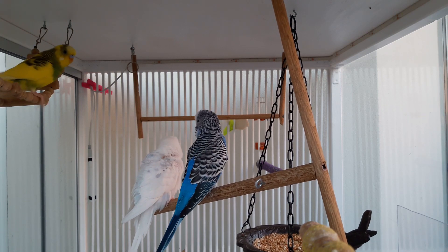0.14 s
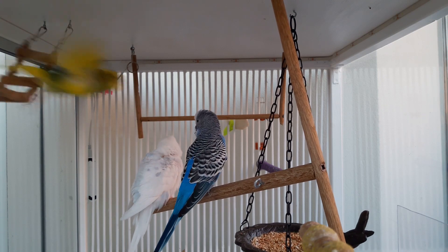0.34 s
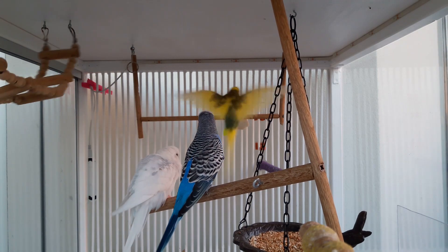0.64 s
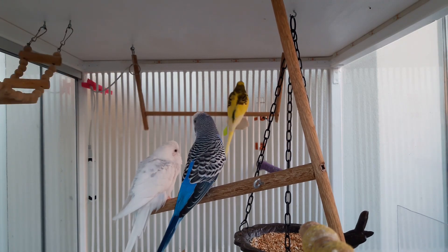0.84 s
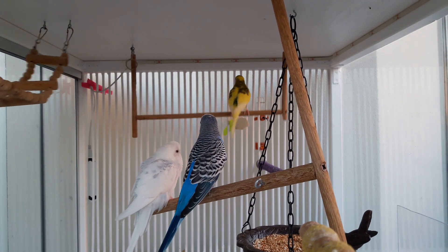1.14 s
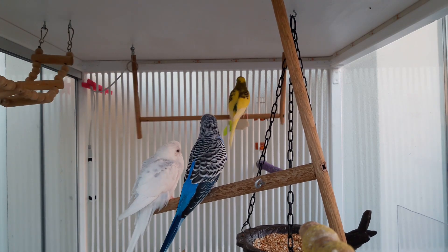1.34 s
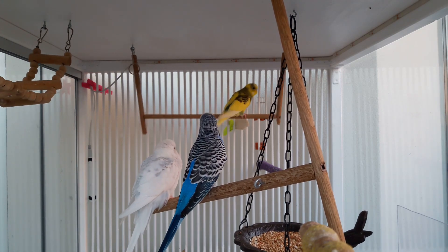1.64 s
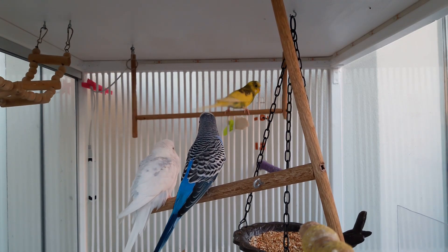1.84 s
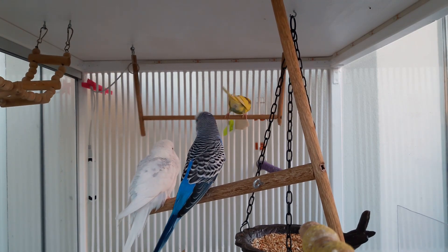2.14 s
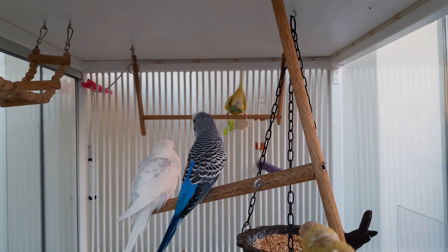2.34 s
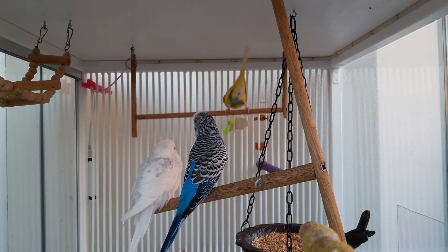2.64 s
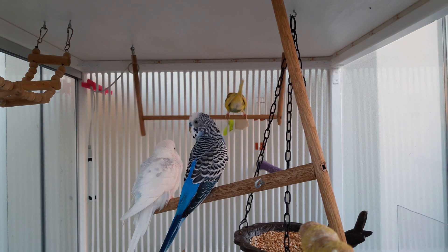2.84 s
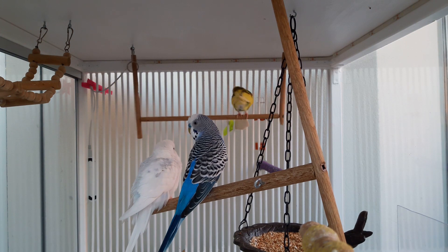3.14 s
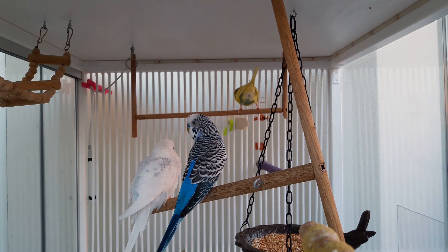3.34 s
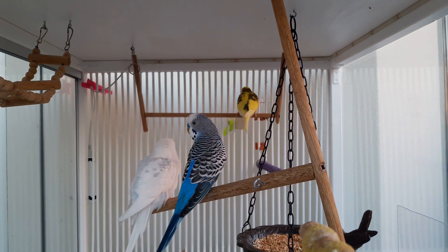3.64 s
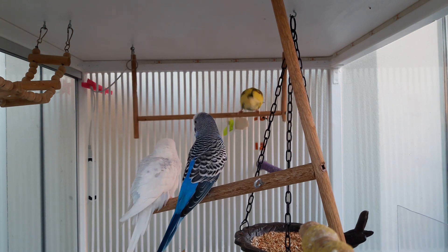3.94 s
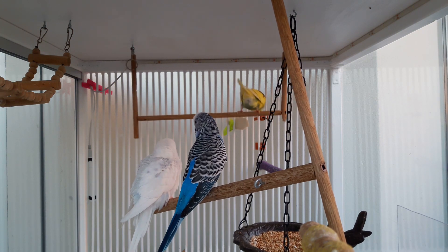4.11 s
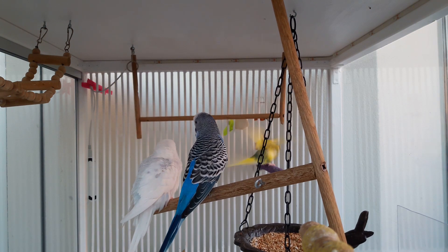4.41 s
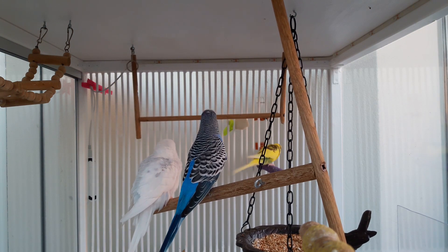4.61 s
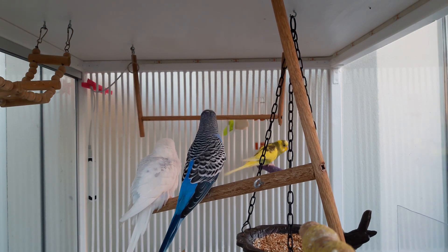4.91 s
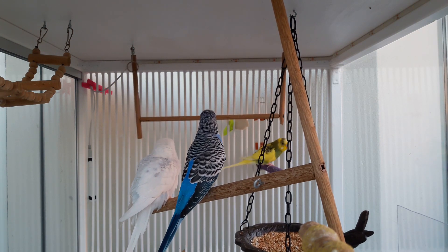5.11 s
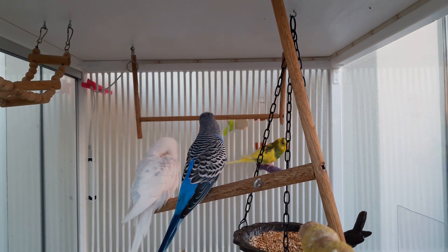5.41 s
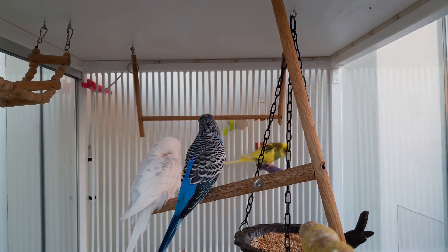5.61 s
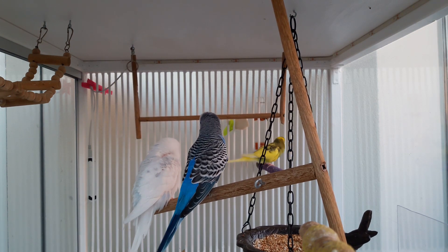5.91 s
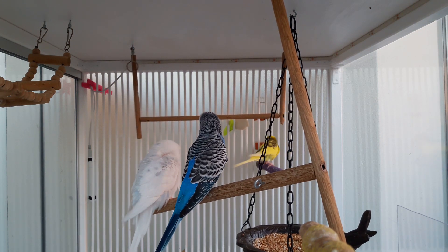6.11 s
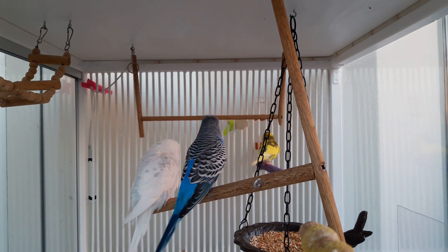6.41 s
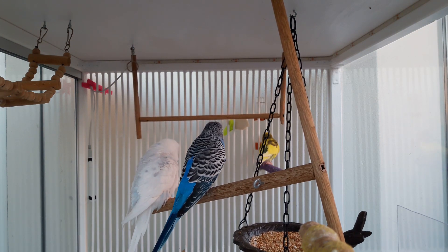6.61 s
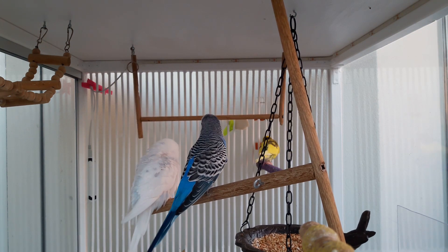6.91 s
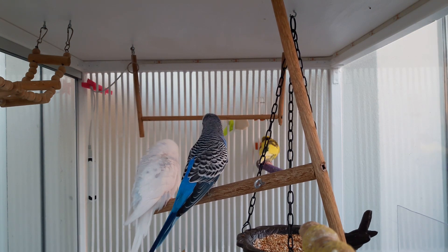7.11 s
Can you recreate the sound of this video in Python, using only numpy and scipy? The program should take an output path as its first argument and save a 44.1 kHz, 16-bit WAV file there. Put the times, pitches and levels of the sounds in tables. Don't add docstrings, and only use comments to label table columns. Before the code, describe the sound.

Short soft wing burst, a sharp perch thud and clinking chain, scattered claw ticks, then two little clusters of quick chirps in a humming small room.

```python
import sys
import numpy as np
from scipy import signal
from scipy.fft import rfft, irfft
from scipy.io import wavfile
from scipy.ndimage import uniform_filter1d

SR = 44100
rng = np.random.default_rng(int(sys.argv[2]) if len(sys.argv) > 2 else 0)


def persist_wave(psi):
    counts = np.round(np.clip(psi, -1, 1) * 32767).astype(np.int16)
    wavfile.write(sys.argv[1], SR, np.atleast_2d(counts).T)


def elevation(decibels):
    levels = np.asarray(decibels, float)
    return 10 ** (levels / 20)


N = 320166
FREQ = np.fft.rfftfreq(N, 1 / SR) + 1e-3


def unit(x):
    return x / np.sqrt(np.mean(x ** 2))


def across(table):
    hz, value = np.transpose(table)
    return np.interp(np.log(FREQ), np.log(hz + 1), value)


def coloured(table):
    white = rng.standard_normal(N)
    return unit(irfft(rfft(white) * elevation(across(table)), N))


def walk(rate_hz):
    hold = int(SR / rate_hz)
    steps = np.repeat(rng.standard_normal(N // hold + 1), hold)
    smooth = uniform_filter1d(uniform_filter1d(steps, hold), hold)
    return unit(smooth[:N])


def ring(x, hz, width_hz):
    return signal.lfilter(*signal.iirpeak(hz, hz / width_hz, fs=SR), x)


def add(out, x, start_s, pan_db, lag=0):
    i = int(start_s * SR) + 20
    x = x[:N - i - 20]
    out[0, i + lag:i + lag + len(x)] += x * elevation(pan_db / 2)
    out[1, i:i + len(x)] += x * elevation(-pan_db / 2)


def bird():
    # start_s [s], length_s [s], pitch_hz [Hz], glide_hz over the note [Hz], peak_db [dB]
    whistles = [
        (3.103, 0.049, 2800, 113, -35),
        (3.13, 0.04, 2542, -1, -31.5),
        (3.787, 0.052, 1805, -45, -32),
        (5.329, 0.063, 3000, -100, -43),
        (5.572, .022, 3830, -190, -30.5),
        (2.41, 0.36, 3730, -67, -70),
    ]
    rasps = [
        (3.156, 0.047, 3303, -200, -37),
        (3.197, 0.033, 2098, -58, -31.5),
        (3.2, 0.044, 1747, -58, -38),
        (5.38, 0.037, 3414, -260, -38.5),
        (5.42, .04, 2216, -100, -31.5),
        (5.585, 0.051, 3420, -300, -29),
    ]
    reeds = [
        (3.301, 0.081, 1648, -23, -34),
        (3.387, 0.014, 1442, -84, -30),
    ]
    nasals = [
        (3.738, 0.052, 1237, 30.2, -34),
    ]
    screeches = [
        (5.522, .034, 2720, -150, -33),
        (5.527, 0.033, 2057, -24, -28.5),
        (5.534, 0.025, 1496, -55, -38.5),
    ]
    warbles = [
        (5.357, 0.056, 2440, 40, -35.5),
    ]
    shrills = [
        (5.491, .034, 1762, 0, -36),
    ]
    # time_s [s], left minus right pan_db [dB]
    head = [
        (3.1, -1.5),
        (3.3, -3.5),
        (3.74, -1),
        (3.8, -5),
        (5.33, -6),
        (5.4, -1.5),
        (5.45, -1.5),
        (5.52, -4),
        (5.6, 1),
    ]
    voices = [
        (whistles, dict(rasp=0.23, flutter_hz=240, parts_db=(-28.5, -33, -33), fall_db=15, dull_db=2.5,
                        air_db=-26.5)),
        (rasps, dict(rasp=0.64, flutter_hz=328.2, parts_db=(-27, -37, -42), fall_db=7, dull_db=6, air_db=-32)),
        (reeds, dict(rasp=0.18, flutter_hz=192.5, parts_db=(-24.5, -20.5, -28), fall_db=2, dull_db=5.5,
                     air_db=-23.5, hold=0.59)),
        (shrills, dict(rasp=0.15, flutter_hz=300, parts_db=(-17, -13, -14), fall_db=3.5, dull_db=2.5,
                       air_db=-13.5, hold=1.4)),
        (nasals, dict(rasp=0.064, flutter_hz=198, parts_db=(3.5, -2, -20), fall_db=3, dull_db=-12.5,
                      air_db=-23, warble=0.59, warble_hz=42.7)),
        (screeches, dict(rasp=0.35, flutter_hz=340, parts_db=(-14, -24.5, -17.5), fall_db=10, dull_db=-1.5,
                         air_db=-15.5, hold=0.39)),
        (warbles, dict(rasp=0.05, flutter_hz=236, parts_db=(-29, -32, -45), fall_db=13, dull_db=2,
                       air_db=-35, warble=0.69, warble_hz=94))]
    swell_db, fade_db, crest_share = -1, 10.5, 0.47
    out = np.zeros((2, N))
    wander, shake, throb = walk(150), walk(500), walk(160)
    air = coloured([(800, -16), (1500, 18.0), (4000, 3.0), (9000, -28.5), (15000, -5.0)])
    for notes, v in voices:
        rasp = v["rasp"]
        higher_db = v["parts_db"][-1] - v["fall_db"] * np.arange(1, 12)
        ladder_db = np.r_[v["parts_db"], higher_db]
        for start_s, length_s, pitch_hz, glide_hz, peak_db in notes:
            t = np.arange(0, length_s, 1 / SR)
            along = t / length_s
            at = slice(int(start_s * SR), int(start_s * SR) + len(t))
            hz = pitch_hz + glide_hz * along
            end_db = fade_db * (1 - v.get("hold", 0))
            level_db = peak_db - np.interp(along, [0, crest_share, 1], [swell_db, 0, end_db])

            flutter = 2 * np.pi * np.cumsum(v["flutter_hz"] * (1 + 0.3 * wander[at])) / SR
            shaky_hz = hz * (1 + 0.006 * throb[at] + 0.014 * shake[::-1][at])
            phase = 2 * np.pi * np.cumsum(shaky_hz) / SR
            phase += rasp * (1.3 * np.sin(flutter) + 0.5 * shake[at])

            count = int(15000 / hz.max())
            upper = sum(elevation(db) * np.sin((k + 2) * phase) for k, db in enumerate(ladder_db[:count - 1]))
            stack = np.sin(phase) + upper * elevation(v["dull_db"] * (1 - along))
            stack += elevation(v["air_db"]) * air[at] * (1 + np.sin(phase))
            stack *= elevation(level_db + 4.5 * np.minimum(throb[::-1][at], 0.5))
            quiver = np.sin(2 * np.pi * v.get("warble_hz", 1) * t * (1 - 0.071 * along) - 0.9)
            stack *= 1 - v.get("warble", 0) * quiver
            edges = np.clip(np.minimum(t / 0.004, (length_s - t) / 0.006), 0, 1)
            stack *= 1.4 * edges * (1 + rasp * np.cos(flutter + 1.9))
            add(out, stack, start_s, np.interp(start_s, *np.transpose(head)), lag=16)
    return signal.sosfilt(signal.butter(4, 1150, "high", fs=SR, output="sos"), out)


def wings():
    # start_s [s], length_s
    # [s], air rush_db [dB], rustle_db and feather hiss_db [dB against the rush]
    bouts = [(0.184, 0.18, -53.5, -14, -38), (0.409, 0.046, -43, -3.5, -8), (0.494, 0.21, -37, -8, -9.5),
             (0.745, 0.0067, -25, -16, -40), (0.803, 0.037, -35, -7.5, -36), (0.941, 0.14, -45.5, -17, -40),
             (1.102, .12, -41.5, -13, -39), (1.247, 0.17, -53, -17, -33), (2.165, 0.13, -51.5, -25, -34),
             (3.45, 0.21, -50, -23, -34), (4.169, 0.092, -50, -22, -32), (4.282, 0.11, -48.5, -25, -20),
             (4.436, 0.072, -46.5, -9, -7), (4.525, .06, -55.5, -19, -20)]
    # hz [Hz], level_db [dB per Hz]
    rush_spectrum = [(18, -39), (30, -13.5), (125, 0), (221, 2.5), (393, -4.5), (548, -11.5), (2500, -19.5),
                     (3250, -52)]
    rustle_spectrum = [(880, -37), (1500, -5), (2100, 2.5), (4380, 0.5), (5290, -3), (7750, -16),
                       (9000, -54), (19800, -80)]
    hiss_spectrum = [(4710, -7), (8000, -4.5), (9180, -5.5), (12000, -1.5), (15200, -5), (15600, -22)]
    rise_s, t60_s, pan_db = 0.015, 0.2, -5.5
    beat_s, beat_hz, beat_depth, gust_depth = 0.45, 18.23, 0.22, 0.88
    t = np.arange(N) / SR
    start_s, length_s, rush_db, rustle_db, hiss_db = np.transpose(bouts)[:, :, None]
    rise = np.clip((t - start_s) / rise_s + 1, 0, 1)
    shapes = rise * elevation(-60 * np.clip(t - start_s - length_s, 0, 1) / t60_s)
    gust, rustle, hiss = (np.sum(shapes * elevation(rush_db - 5.5 + db), axis=0) for db in (0, rustle_db, hiss_db))

    flying = np.clip(np.minimum(t - 0.4, 0.78 - t) / 0.031, 0, 1)
    beat = flying * np.cos(2 * np.pi * beat_hz * (t - beat_s))
    stroke = 1 + beat_depth * beat
    rush = coloured(rush_spectrum) * elevation(2.5 * walk(60)) * (1 + gust_depth * beat)
    out = np.zeros((2, N))
    for ear, side in enumerate((1, -1)):
        feathers = coloured(hiss_spectrum) * hiss * stroke
        feathers += coloured(rustle_spectrum) * rustle * elevation(4.5 * walk(500))
        near = 0.63 * coloured([(100, -34), (500, -4.5), (1500, -8.5), (2500, -18.0), (4000, -33.5)])
        sided = (near * gust + feathers) * elevation(side * pan_db / 2)
        out[ear] = (0.62 * rush * gust + sided) * stroke
    return out


def ticks(rows, t60_s):
    out, t = np.zeros((2, N)), np.arange(6000) / SR
    chance = rng.random((len(rows), 3))
    grit = rng.standard_normal((len(rows), len(t)))
    for (start_s, peak_db, hz, pan_db), c, g in zip(rows, chance, grit):
        crack = ring(g, 2200, 4000) * elevation(-60 * t / 0.03)
        g = g * elevation(-60 * t / t60_s)
        body = ring(g, hz, 0.098 * hz)
        body += 0.087 * ring(g, hz * (0.95 + 0.18 * c[0]), 0.013 * hz)
        body += 0.56 * ring(g, hz * (0.6 + 0.15 * c[1]), 0.21 * hz)
        body += 0.033 * crack
        body *= elevation(peak_db - 3) / np.abs(body).max()
        add(out, body, start_s - 0.0005, pan_db, lag=int(24 * c[2]) - 12)
    return out


def swing_links():
    links = [(.166, -44.5, 3200, -9), (.2379, -51, 4270, -23), (.2558, -37, 3200, -6),
             (.4057, -44, 3050, 8), (.5088, -36.5, 3870, 11), (.709, -34.5, 3320, 0),
             (.7385, -26, 2790, -14), (.7466, -36, 2900, 6), (.8167, -34.5, 3780, 7),
             (.8627, -24, 5600, -5.5), (.8992, -37, 2600, -5), (.9444, -41, 3070, 3),
             (.9816, -37, 3400, -5), (1.0151, -31.5, 4460, -9.5), (1.0967, -45.5, 3850, 1),
             (1.118, -38, 3090, -14), (1.1496, -34, 3770, -8), (1.1812, -36, 4060, -7),
             (1.1994, -39.5, 3140, -20), (1.238, -42.5, 3450, -1.5), (1.2586, -35.5, 3000, -1),
             (1.3656, -40.5, 3100, -6), (1.4426, -49, 2580, -2)]
    return ticks(links, t60_s=0.06)


def claws():
    taps = [(1.5465, -28.5, 3750, -8), (1.5914, -42, 2870, -2), (1.6392, -48.5, 3040, 0),
            (1.8278, -37, 3800, -8), (2.176, -37.5, 5170, -3), (2.6618, -42.5, 2660, -11),
            (2.833, -47.5, 3800, -7), (3.1987, -39, 3080, 0), (3.467, -40, 3300, -4),
            (3.5573, -49, 2480, -2.5), (3.616, -47, 2580, -5), (4.1614, -46.5, 2650, -4),
            (4.2736, -53, 3860, 2), (4.365, -40, 4640, -8), (4.4395, -33.5, 3100, -2),
            (4.4937, -40, 2810, -4), (7.0775, -50, 2830, -1)]
    return ticks(taps, t60_s=0.042)


def knocks():
    # start_s [s], peak_db [dB], ring_hz [Hz], t60_s [s], share of rattling frame [0-1]
    blows = [(0.426, -40.5, 293, 0.2, 0.55), (0.545, -34, 219.5, 0.096, 0.22), (0.747, -15, 190, 0.043, 1),
             (0.819, -26.5, 686, 0.045, 1), (1.016, -39, 1024, 0.045, 0.32),
             (1.119, -43, 166.2, 0.26, 0.37), (1.546, -35.5, 216, 0.086, 0.68),
             (1.762, -35, 203, 0.071, 0.091), (2.18, -34.5, 193, 0.095, 1), (2.658, -41.5, 327, 0.12, 0.97),
             (3.207, -30.5, 206, 0.06, 0.32), (3.351, -39.5, 190, 0.12, 0.77),
             (3.469, -36.5, 780, 0.056, 0.76), (4.29, -33, 736, 0.046, .8),
             (4.305, -40.5, 206, 0.083, 0.18), (4.338, -40.5, 190, 0.14, .2), (4.366, -29, 535, 0.066, 1),
             (4.488, -29, 798, 0.084, 1)]
    # ring_hz [Hz], width_hz [Hz], level_db [dB]
    wood = [(190, 11, -10), (324, 31, -2), (752, 137, 21.5), (1400, 500, 13)]
    out, t = np.zeros((2, N)), np.arange(12000) / SR
    grit = rng.standard_normal((len(blows), len(t)))
    for (start_s, peak_db, hz, t60_s, share), g in zip(blows, grit):
        scuff = g * elevation(-60 * t / 0.055) + 9 * (t < 0.0008)
        frame = sum(elevation(mode_db) * unit(ring(scuff, f, width_hz)) for f, width_hz, mode_db in wood)
        own = np.sin(2 * np.pi * hz * t) * elevation(-60 * t / t60_s) * (1 - np.exp(-t / 0.0073))
        body = own + share * frame / np.abs(frame).max()
        add(out, elevation(peak_db - 3) * body / np.abs(body).max(), start_s, -0.5, lag=3)
    return out


def room(dry):
    t60_s, level_db, alike_below_hz = 0.22, -8.5, 600
    t = np.arange(int(0.6 * SR)) / SR
    tail = rng.standard_normal((2, len(t)))
    strong = rng.random((2, len(t))) < 0.004
    tail *= 1 + 6 * strong * np.exp(-t / 0.0033)
    dull = signal.lfilter([0.3], [1, -0.7], tail)
    bright = tail - dull
    tail = dull * elevation(-60 * t / t60_s) + 0.53 * bright * elevation(-60 * t / (0.43 * t60_s))
    lows = signal.lfilter(*signal.butter(N=2, Wn=alike_below_hz, fs=SR), tail)
    tail += lows[0] - lows
    tail *= np.clip((t - 0.002) / 0.0032, 0, 1)
    tail /= np.sqrt(np.sum(tail ** 2, axis=1, keepdims=True))
    return dry + elevation(level_db) * signal.fftconvolve(dry, tail, axes=1)[:, :N]


def hum():
    # hz [Hz], level_db [dB per Hz]
    rumble = [(25, -27.5), (60, -8.5), (300, -9), (900, -13.5), (2200, -23.5), (3200, -33), (4500, -33),
              (9500, -55)]
    # pitch_hz [Hz], level_db [dB]
    lines = [(134.6, -67), (220.7, -66.5), (290.7, -59.5), (366.1, -75.5), (1174, -78.5), (2056, -78)]
    # hz [Hz], likeness [0-1, below 0 counts as 0]
    likeness = [(60, 1), (130, 0.94), (290, 0.99), (640, 0.64), (1410, -0.13), (3100, 0.32), (6820, 0),
                (15000, 1)]
    # hz [Hz], left minus right level_db [dB]
    balance = [(60, -0.5), (110, -0.5), (200, -0.5), (380, -1.5), (2380, -1.5), (4400, -2.5), (8120, 3.5),
               (15000, 25)]
    hum_db, fade_db_per_s, lag_s = -52.5, 0.3963, 14 / 44100
    draught_db, draught_s, draught_width_s = 13.5, 0.63, 0.081
    t = np.arange(N) / SR
    shared = coloured(rumble) * elevation(0.13 * walk(2.96))
    alike = np.clip(across(likeness), 0, 1) ** 0.5
    right = alike * np.exp(2j * np.pi * FREQ * lag_s) * rfft(shared)
    right += np.sqrt(1 - alike ** 2) * rfft(coloured(rumble))
    tilt = elevation(across(balance) / 2)
    air = np.array([irfft(rfft(shared) * tilt, N), irfft(right / tilt, N)])
    tones = 0
    for hz, db in lines:
        level = 1.26 * elevation(db + 2.93 * walk(12))
        tones = tones + level * np.sin(2 * np.pi * hz * t + 2.6 * walk(10))
    draught = np.exp(-((t - draught_s) / draught_width_s) ** 2)
    level_db = hum_db - fade_db_per_s * t + draught_db * draught
    return (air + tones * elevation(54)) * elevation(level_db)


def scene():
    # hz [Hz], level_db [dB]
    port = [(100, 1), (6000, 0), (8000, -4.5), (9800, -12.5), (12000, -6), (15700, -6.5)]
    # hz [Hz], left minus right level_db [dB]
    port_tilt = [(60, -5), (110, 0.5), (380, -1), (700, 3), (1290, 6), (4400, -0.5), (8120, 17), (15000, 8)]
    dry_sounds = elevation(0.5) * bird() + elevation(1.5) * wings() + swing_links() + claws() + knocks()
    near = room(dry_sounds)
    port_db = across(port) + np.array([[0.5], [-0.5]]) * across(port_tilt)
    return irfft(rfft(near) * elevation(port_db), N) + hum()


def band_limit(x):
    return signal.sosfilt(signal.butter(12, 15790, fs=SR, output="sos"), x)


def record(dry):
    # hz [Hz], level_db [dB per Hz]
    self_noise = [(4710, -16), (8000, 2.5), (9100, -3.5), (12800, 8), (15200, 7), (15600, -0.5)]
    hiss = elevation(-75.0) * np.array([coloured(self_noise), coloured(self_noise)])
    return band_limit(dry + hiss)


dry = scene()
out = record(dry)
persist_wave(out)
```